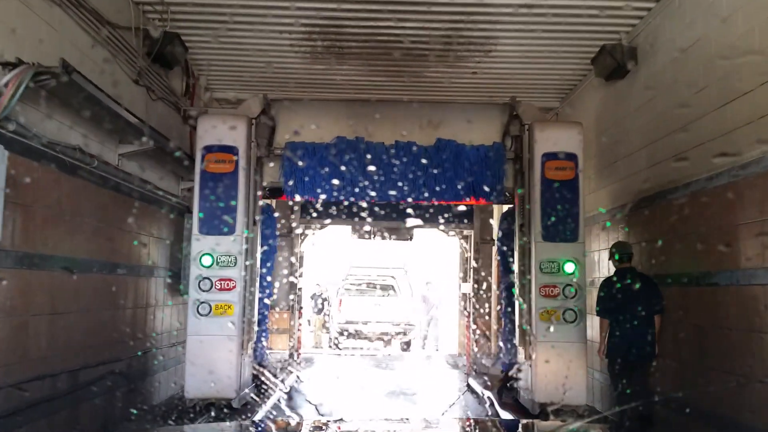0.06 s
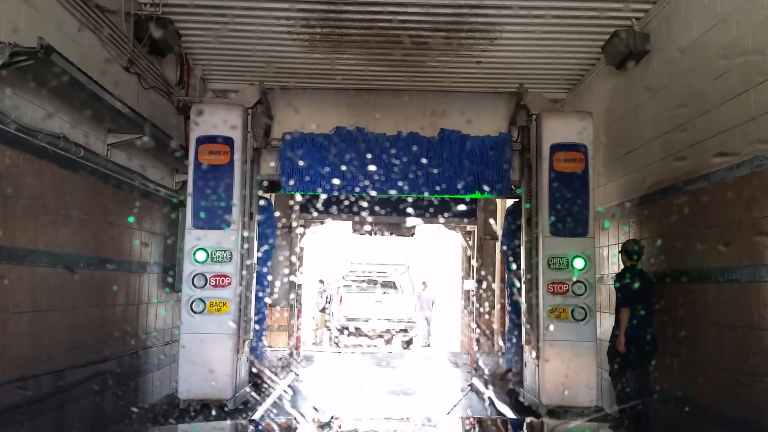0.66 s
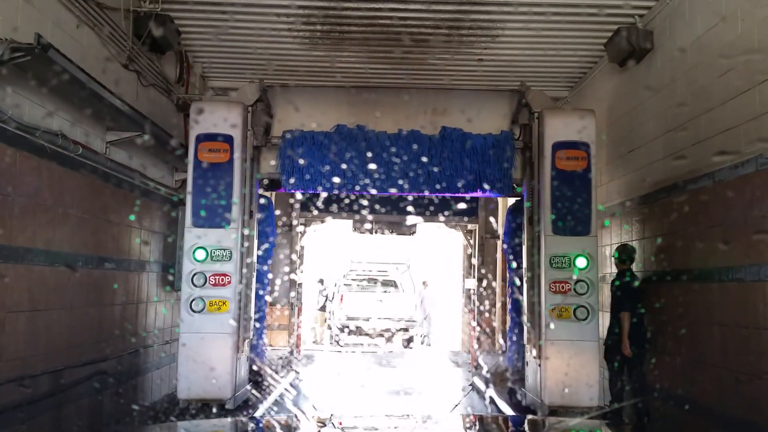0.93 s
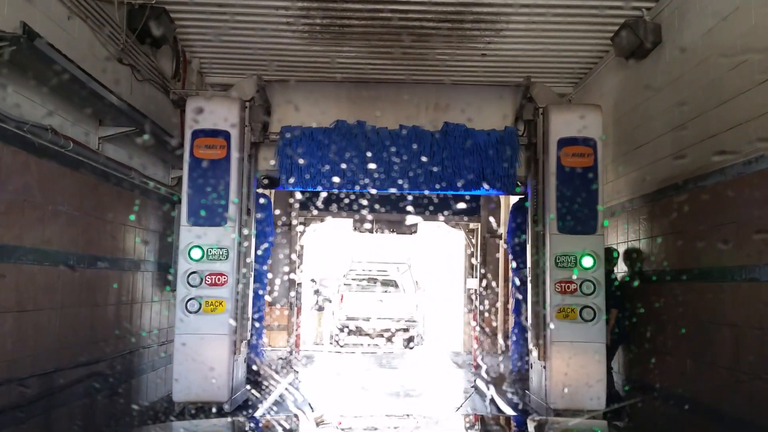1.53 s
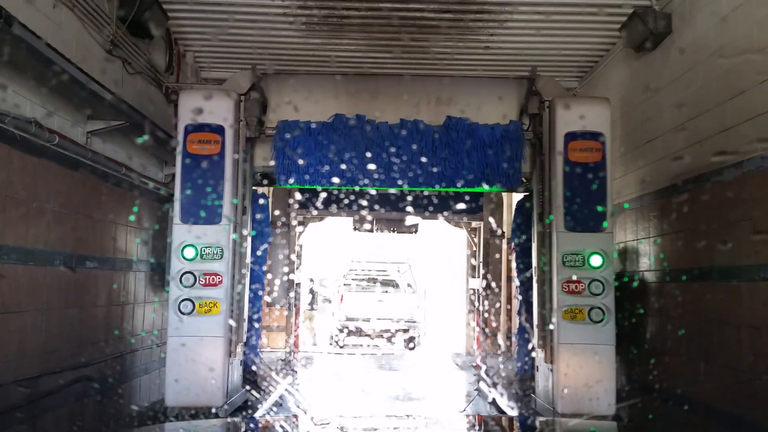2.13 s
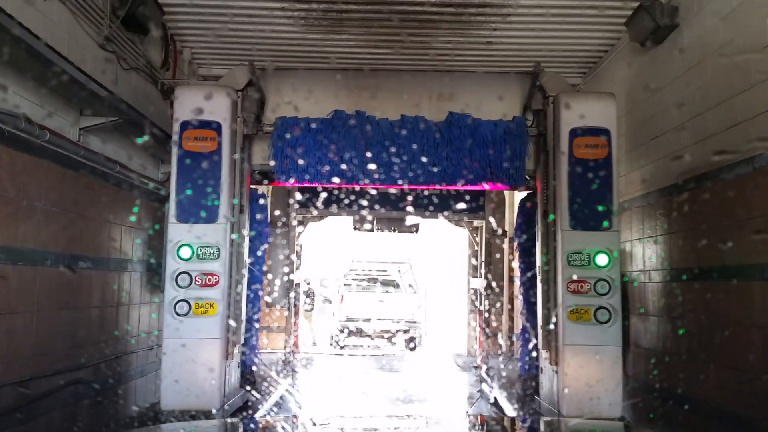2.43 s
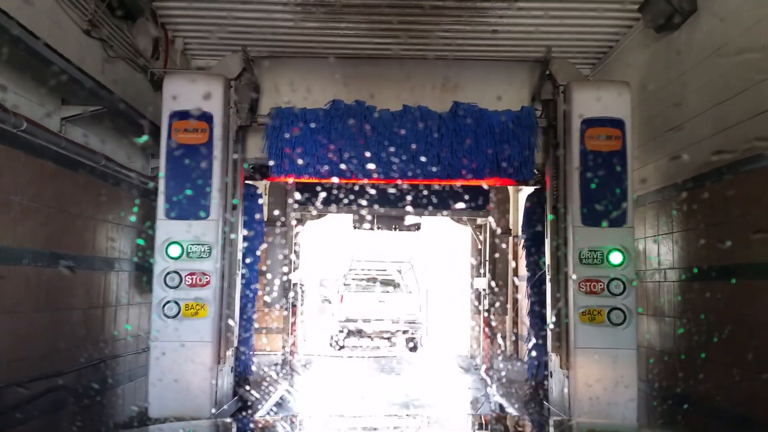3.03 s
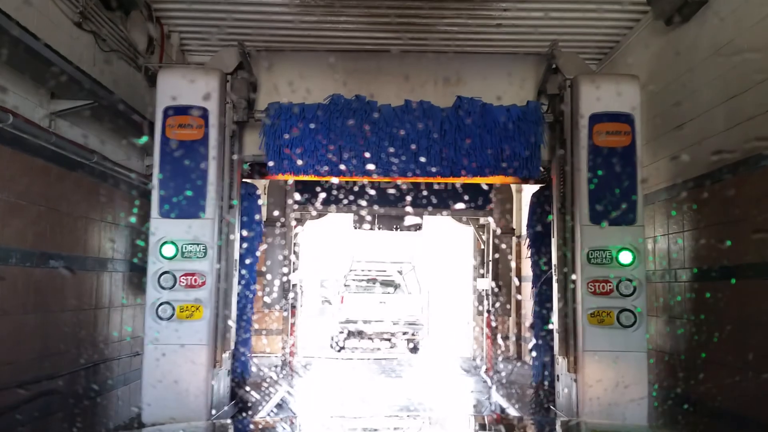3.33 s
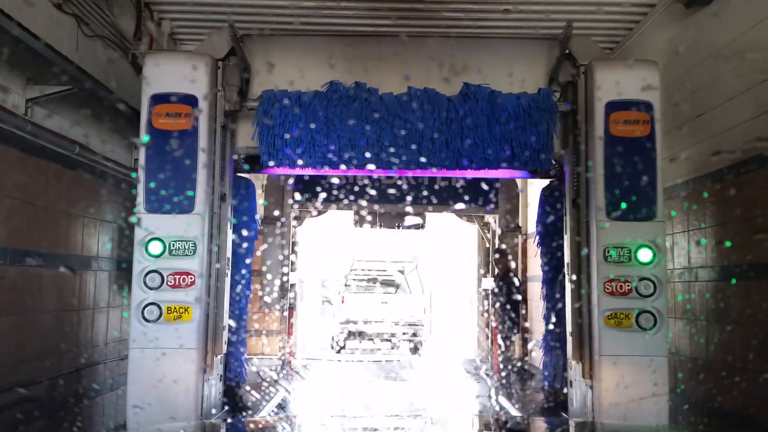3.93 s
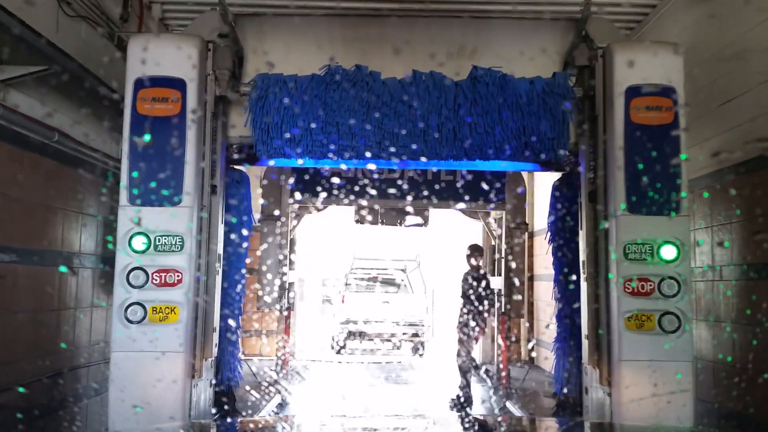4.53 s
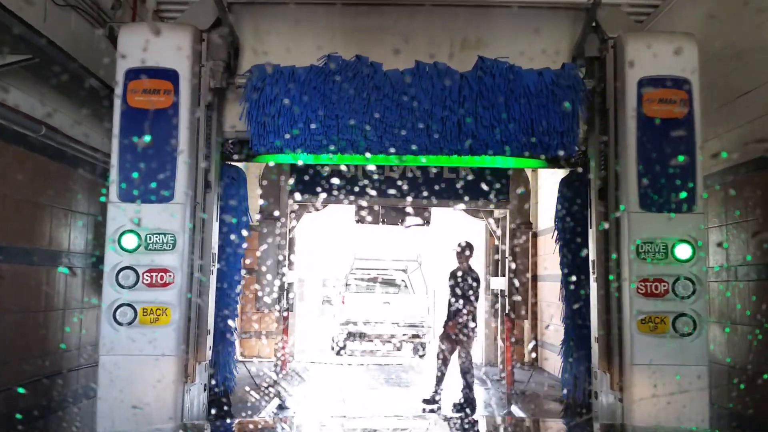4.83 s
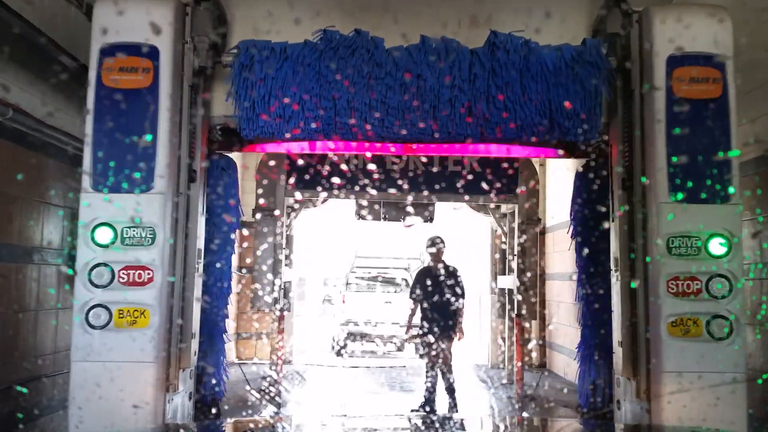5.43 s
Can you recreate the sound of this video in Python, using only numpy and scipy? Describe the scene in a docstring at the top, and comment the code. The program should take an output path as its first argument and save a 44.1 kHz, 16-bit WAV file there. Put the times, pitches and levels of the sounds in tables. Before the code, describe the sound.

A brief spray of water hits a car's roof and windows and quickly fades to a fine mist, heard from the front seat. Underneath, the throbbing idle and the muffled rumble of car wash brushes carry on steadily with a soft rush of air. Dull knocks on the bodywork come mostly in the first half, with a few faint drips on the glass. Late on, the microphone takes one short, low bump on the right.

```python
"""Idling in a car wash

Inside a car, the engine's firings boom and knock through the body, the brush gantry rumbles and air
rushes through the cabin's resonances. A last burst of spray drums on the roof and patters on the glass,
then thins to mist as its pressure falls. Panels thud, a few drops tick on the windscreen, and near the
end something bumps the right microphone."""
import sys
import numpy as np
from scipy import signal
from scipy.fft import rfft, irfft
from scipy.io import wavfile
from scipy.ndimage import uniform_filter1d

SR = 44100
rng = np.random.default_rng(int(sys.argv[2]) if len(sys.argv) > 2 else 0)


def unload_wav(signal):
    """Save mono or channel-first audio to the path in sys.argv[1] as 16-bit WAV at rate SR, clipped to [-1, 1]."""
    wavfile.write(
        sys.argv[1],
        SR,
        np.round(np.clip(np.atleast_2d(signal).T, -1, 1) * 32767).astype(np.int16),
    )


N = 246078
TIME = np.arange(N) / SR
FREQS = np.maximum(np.arange(N // 2 + 1) * SR / N, 1)


def undb(db):
    """Amplitude ratio of a level in decibels."""
    return 10 ** (np.asarray(db) / 20)


def unit(x):
    """Normalisation to an rms of 1."""
    return x / np.sqrt(np.mean(x ** 2))


def across(table):
    """Interpolation of (frequency, value) rows over log frequency."""
    hz, value = np.transpose(table)
    return np.interp(np.log(FREQS), np.log(hz), value)


def pan(db):
    """Interaural level difference, left minus right, as two gains."""
    return undb(np.array([[db], [-db]]) / 2)


def waver(rate):
    """Random modulation: values held for 1 / rate seconds and smoothed twice; spread near 1."""
    hold = int(SR / rate)
    steps = np.repeat(rng.standard_normal(N // hold + 2), hold)
    held = steps[rng.integers(hold):][:N]
    return np.sqrt(2) * uniform_filter1d(uniform_filter1d(held, hold), hold)


def noise():
    """Two uncorrelated white noises."""
    return rng.standard_normal((2, N))


def patter(rate, spread_db):
    """Shot noise: two streams of random impacts, many small and a few large."""
    hits = rng.random((2, N)) < rate / SR
    signs = np.sign(noise())
    sizes = undb(spread_db * np.minimum(rng.exponential(size=(2, N)), np.pi))
    return unit(hits * signs * sizes)


def strike(times, sizes, modes):
    """Impulse response: each blow rings damped modes (frequency [Hz], T60 [s], relative level [dB])."""
    blows = np.zeros(N)
    np.add.at(blows, np.clip((np.asarray(times) * SR).astype(int), 0, N - 1), sizes)
    t = TIME[:SR // 2]
    ring = sum(undb(db) * np.sin(2 * np.pi * hz * t) * 1000 ** (-t / t60) for hz, t60, db in modes)
    return signal.fftconvolve(blows, ring / np.abs(ring).max())[:N]


def muffle(x, hz):
    """Low-pass filtering: soft contact and trim take the treble off a blow."""
    return signal.sosfilt(signal.butter(4, hz, fs=SR, output="sos"), x)


# likeness of the two ears: (frequency [Hz], correlation [-])
EAR_CORRELATION = [(30, 1), (60, .93), (130, 0.76), (290, 0.44), (640, 0.41), (1400, 0.077), (3000, 0)]
# balance of the two ears: (frequency [Hz], left minus right [dB])
EAR_BALANCE = [(60, -2.5), (200, 0.5), (380, 3), (700, 0.5), (1250, 4), (2400, 6), (4000, 2), (5500, -4.5),
               (8100, 9), (12500, 5.5), (15000, 4)]
def cabin(pair, spectrum):
    """Interaural coherence: of a pair shaped to a spectrum, bass is shared and treble is diffuse."""
    first, second = rfft(pair) * undb(across(spectrum))
    correlation = np.clip(across(EAR_CORRELATION), -1, 1)
    mid, side = first * np.sqrt(1 + correlation), second * np.sqrt(1 - correlation)
    lean = undb(across(EAR_BALANCE) / 2)
    return unit(irfft(np.array([(mid + side) * lean, (mid - side) / lean]), N))


def faint_ticking(rate_hz=8, first_s=.029, level_db=-82, scatter_db=2):
    """A periodic impulse train, high-passed to a very faint, thin tick."""
    times = np.arange(first_s, TIME[-1], 1 / rate_hz)
    clicks = np.zeros(N)
    clicks[(times * SR).astype(int)] = undb(scatter_db * rng.standard_normal(len(times)))
    thin = signal.sosfilt(signal.butter(10, 11800, "high", fs=SR, output="sos"), clicks)
    return unit(thin) * undb(level_db)


# spectra of the rushing air and the thin hiss: (frequency [Hz], relative level [dB])
RUSH_SPECTRUM = [(200, -15.5), (420, 4), (520, 3.5), (610, -1), (730, 0), (860, -4.5), (960, -5.5),
                 (1350, -6.5), (1800, -8), (2050, -19.5), (3200, -29.5), (4400, -29), (5200, -47.5),
                 (9000, -54.5)]
THIN_HISS_SPECTRUM = [(3000, -11.5), (6000, -26), (8200, -21), (10300, -16.5), (12500, 4.5), (14000, 2),
                      (16000, 2)]
# cabin and vent modes: (frequency [Hz], width [Hz], level [dB], left minus right [dB], phase [rad])
CABIN_MODES = [(185.5, 49, -42.5, -1.5, -0.63), (331, 61, -47, 3.5, -.4), (700, 136, -53.5, 5, -0.7),
               (786.5, 114, -53, 5, 0.6), (1161, 84, -59.5, 11.5, 1.97), (1634, 300, -66, 7, 0.07),
               (2380, 230, -76, 3, 4.5), (3850, 600, -72.5, 9, 1.5)]
def air(rush_db=-51, flutter_db=0.83):
    """Resonance: rushing air excites the cabin's broad modes, over a thin, slightly grainy high hiss."""
    rush = cabin(noise(), RUSH_SPECTRUM) * undb(rush_db + flutter_db * waver(12))
    for hz, width, db, lean_db, phase in CABIN_MODES:
        detuning = (FREQS / hz - hz / FREQS) * hz / width
        wave = rfft(rng.standard_normal(N)) / (1 + detuning ** 2)
        # a standing wave reaches each ear at its own level and phase
        ears = irfft(wave * np.array([[np.exp(1j * phase)], [1]]), N) * pan(lean_db)
        rush += unit(ears) * undb(db + flutter_db * waver(14))
    grainy = noise() + 0.53 * patter(rate=790, spread_db=0.5)
    return rush + cabin(grainy, THIN_HISS_SPECTRUM) * undb(-68.5 + .6 * waver(16))


# the brushes heard through the closed car: (frequency [Hz], relative level [dB])
BRUSH_SPECTRUM = [(14, -36), (28, 1.5), (62, -2.5), (95, 0.5), (120, -1), (170, -2), (240, -3.5),
                  (280, -9.5), (320, -14.5), (380, -12.5), (450, -17.5), (600, -36), (1000, -77)]
def gantry(level_db=-32, waver_db=.5):
    """Superposition: the flapping cloth strips of the turning brushes merge into an uneven rumble."""
    flaps = cabin(patter(rate=1500, spread_db=2.5), BRUSH_SPECTRUM)
    return flaps * undb(level_db + waver_db * waver(10))


# lone drops on the windscreen and, at 4.77 s, the tick of the microphone bump: (time [s], level [dB])
BRIGHT_TICKS = [(.892, -64), (1.403, -66), (2.247, -63), (4.77, -64), (5.052, -65), (5.129, -59.5),
                (5.137, -66)]
# the ping in each tick: (frequency [Hz], T60 [s], relative level [dB])
PING_MODE = [(2900, .03, 0)]
def bright_ticks(decay_s=.003, ping_db=-1):
    """Impact excitation: each drop, and the bump too, gives a brief bright burst and a small ping."""
    bursts = sum(undb(db) * (TIME >= s) * np.exp(-np.abs(TIME - s) / decay_s) for s, db in BRIGHT_TICKS)
    bright = cabin(noise(), spectrum=[(1200, -14.5), (2900, 9), (4500, -10), (8500, 2), (15000, -3)])
    times, levels_db = np.transpose(BRIGHT_TICKS)
    return bursts * bright / 2 + strike(times, undb(levels_db + ping_db), PING_MODE)


# blows on the body: (time [s], level [dB], pitch [Hz])
PANEL_BLOWS = [(0.079, -18, 138.5), (.148, -24, 125), (.307, -20, 121), (.622, -24, 184.5),
               (1.368, -24.5, 112), (1.438, -23.5, 143.5), (1.63, -23.5, 114), (2.973, -25.5, 136.6),
               (4.041, -24, 112)]
# modes of a panel: (multiple of its pitch [-], T60 [s], relative level [dB])
PANEL_MODES = [(1, .18, -0.5), (2.3, .035, -9)]
def thuds():
    """Damped free vibration: struck body panels thud dully, each at its own pitch."""
    panels = np.zeros(N)
    for s, db, hz in PANEL_BLOWS:
        modes = [(hz * ratio, t60, mode_db) for ratio, t60, mode_db in PANEL_MODES]
        panels += strike([s], [undb(db)], modes)
    return muffle(panels, hz=590)


# pushes on the right microphone: (time [s], level [dB])
PUSHES = [(4.7763, -7), (4.78, -5.5)]
# modes of its housing: (frequency [Hz], T60 [s], relative level [dB])
HOUSING_MODES = [(88, .045, 4), (248, 0.044, -5)]
def bump(push_s=.0012, leak_hz=58, housing_db=-14):
    """Structure-borne sound: a soft double push rings the microphone housing; its pressure leaks away."""
    push = sum(undb(db) * np.exp(-((TIME - s) / push_s) ** 2) for s, db in PUSHES)
    swing = signal.sosfilt(signal.butter(2, leak_hz, "high", fs=SR, output="sos"), push)
    contact_s = PUSHES[0][0] - 2 * push_s
    ring = muffle(strike([contact_s], [undb(housing_db)], HOUSING_MODES), hz=600)
    return (swing + ring) * np.array([[undb(-32)], [1]])


def pressure(shut_s, halving_s=0.17):
    """Hyperbolic decay: water pressure is full until the valve shuts, then bleeds away ever slower."""
    return 1 / (1 + np.maximum(TIME - shut_s, 0) / halving_s)


# spectra of the spray's four sounds: (frequency [Hz], relative level [dB])
ROOF_SPECTRUM = [(40, -16.5), (90, -18), (130, -1.5), (190, -12.5), (260, -20.5), (400, -12), (560, -26.5),
                 (800, -23.5), (1200, -47), (3000, -79)]
GLASS_SPECTRUM = [(400, -10.5), (900, 1.5), (1200, -3), (1700, -3), (2000, -10.5), (2450, -6),
                  (3100, -11.5), (3700, -14), (5000, -23.5), (6500, -26), (8200, -25.5), (10400, -26.5),
                  (11600, -27.5), (15500, -25)]
JET_SPECTRUM = [(4000, -34), (6600, -13.5), (7200, -1), (8400, 3), (9500, -8), (10600, -4), (11800, -9.5),
                (15500, -19)]
NOZZLE_SPECTRUM = [(8000, -34), (12000, -17), (13500, -0.5), (14500, 2), (16000, -5.5)]
def spray(nearest_s=0.1, rise_db_per_s=25.5, mist_s=2.0, mist_width_s=.55):
    """Power laws: drumming, patter and hiss follow a jet's pressure, sizzle that of a fine nozzle."""
    jet, nozzle = pressure(shut_s=0.24), pressure(shut_s=.66)
    swing_db = rise_db_per_s * np.minimum(TIME - nearest_s, 0)  # the jet swings over the car
    mist_db = 6 * np.exp(-((TIME - mist_s) / mist_width_s) ** 2)  # a cloud of mist drifts by
    roof = cabin(patter(rate=900, spread_db=2), ROOF_SPECTRUM)
    roof *= undb(-29.5 + swing_db) * jet ** 2.4
    glass = cabin(patter(rate=9000, spread_db=2), GLASS_SPECTRUM)
    glass *= undb(-46 + swing_db / 2 + waver(25)) * jet ** 0.95
    hiss = cabin(noise(), JET_SPECTRUM) * undb(-63.5 + mist_db + 1.1 * waver(12)) * jet ** 1.13
    sizzle = cabin(noise(), NOZZLE_SPECTRUM) * undb(-61.5) * nozzle ** 0.99
    return roof + glass + hiss * pan(4) + sizzle * pan(-12)


def pulley(firing_hz, cycles, ratio=7.12, loaded_hz=23.6, fade_db_per_hz=9.5):
    """Rotational tone: a pulley drones as the idle sags under load and fades as the engine speeds up."""
    level_db = -34.5 - fade_db_per_hz * np.maximum(firing_hz - loaded_hz, 0) + 1.5 * waver(6.7)
    return np.sqrt(2) * undb(level_db) * np.sin(2 * np.pi * ratio * cycles)


# idle speed: (time [s], firing rate [Hz])
FIRING_RATE = [(0.0, 24.88), (0.6, 24.41), (1.2, 24.31), (1.7, 23.51), (2.2, 23.04), (2.8, 23.28),
               (3.3, 23.8), (3.7, 24.49), (4.4, 24.24), (5.0, 24.53), (5.58, 24.03)]
# cabin boom and engine hum: (harmonic of the four-stroke cycle [-], level [dB])
BOOM_HARMONICS = [(2, -32.5), (4, -35), (6, -50)]
HUM_HARMONICS = [(9, -46.5), (12, -50), (14, -45), (16, -48), (18, -50.5), (21, -48), (22, -57), (25, -49),
                 (26, -47.5), (27, -50.5), (28, -52), (30, -60.5)]
# modes of the car body: (frequency [Hz], T60 [s], relative level [dB])
BODY_MODES = [(102, 0.018, -1), (181, 0.045, -3), (257, 0.062, 8), (303, 0.054, 8), (406, 0.067, -11)]
def engine(start_cycles=-.71, hard_db=-27, soft_db=-31, waver_db=0.33):
    """Forced vibration: firings drive a boom and a hum, and knock the body hard and softly in turn."""
    firing_hz = np.interp(TIME, *np.transpose(FIRING_RATE))
    cycles = start_cycles + np.cumsum(firing_hz) / SR / 2  # two firings per cycle
    boom, hum = np.zeros((2, N))
    for harmonic, db in BOOM_HARMONICS:
        amplitude = np.sqrt(2) * undb(db + waver_db * waver(7.8))
        boom -= amplitude * np.cos(2 * np.pi * harmonic * cycles)
    for harmonic, db in HUM_HARMONICS:
        amplitude = np.sqrt(2) * undb(db + waver_db * waver(2.7))
        hum += amplitude * np.sin(2 * np.pi * (harmonic * cycles + rng.random()))
    firings = np.arange(-1, int(2 * cycles[-1]))
    times = np.interp(firings / 2, cycles, TIME)
    sizes = undb(np.where(firings % 2, soft_db, hard_db))
    knocks = muffle(strike(times, sizes, BODY_MODES), hz=527)
    return (boom + pulley(firing_hz, cycles)) * pan(-0.68) + (knocks + hum) * pan(-.2)


def scene():
    """Superposition of all sources at the front seat."""
    return faint_ticking() + air() + gantry() + bright_ticks() + thuds() + bump() + spray() + engine()


def record(dry, cutoff_hz=15700):
    """Band limiting: a steep low-pass removes the highest treble."""
    return signal.sosfilt(signal.ellip(10, .1, 80, cutoff_hz, fs=SR, output="sos"), dry)


dry = scene()
out = record(dry)
unload_wav(out)
```